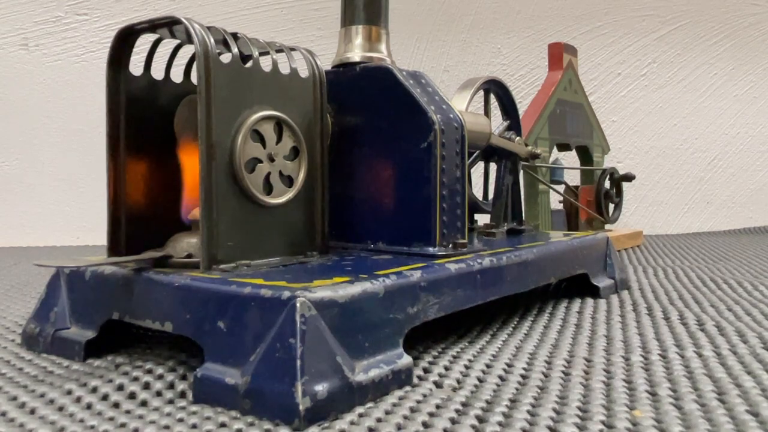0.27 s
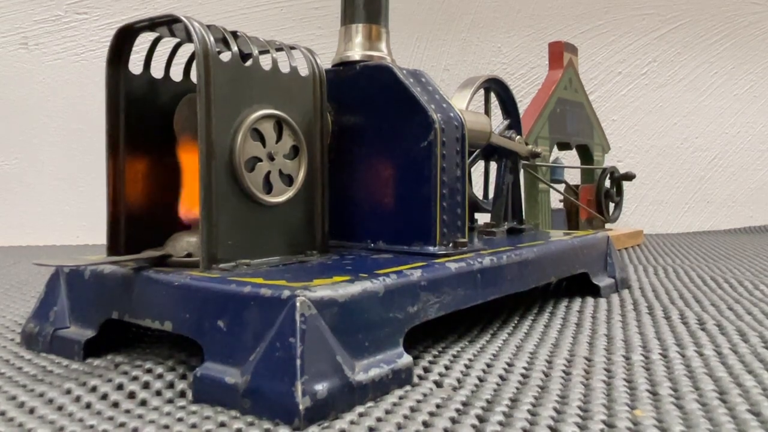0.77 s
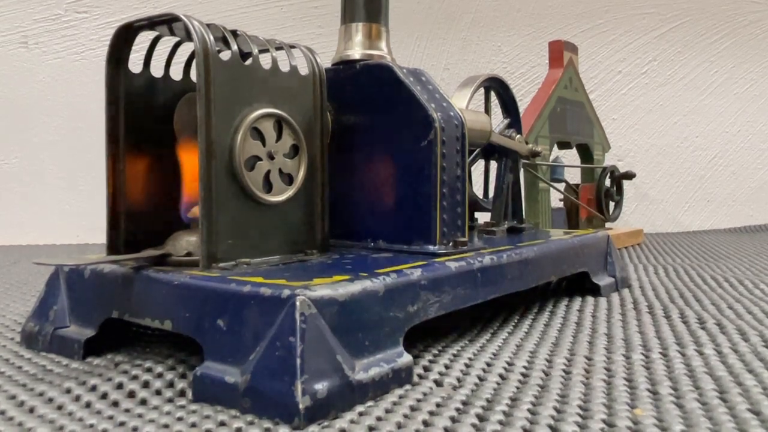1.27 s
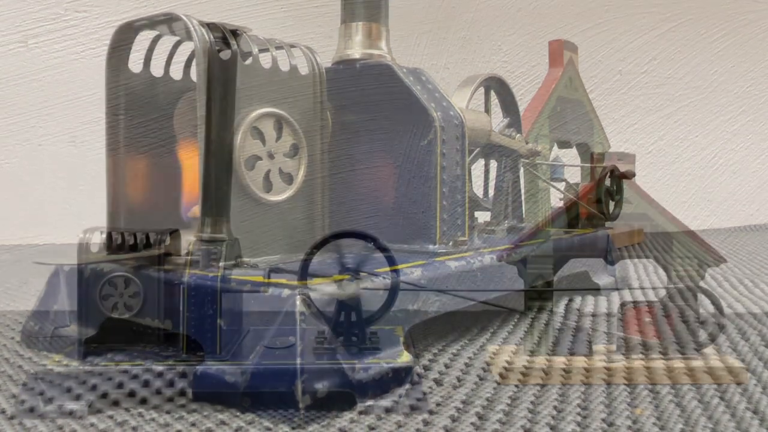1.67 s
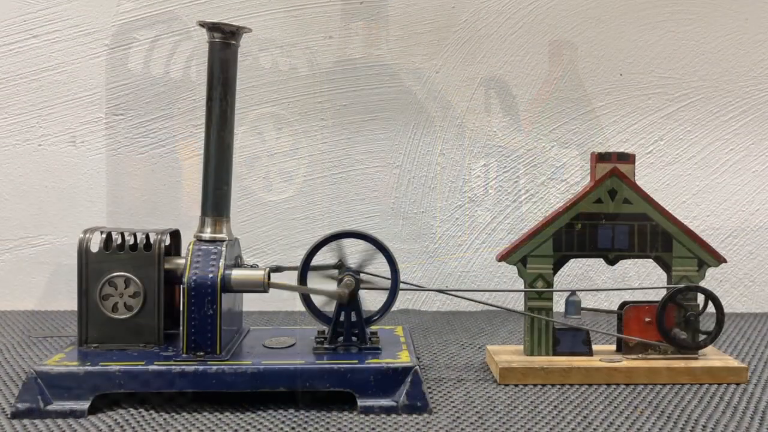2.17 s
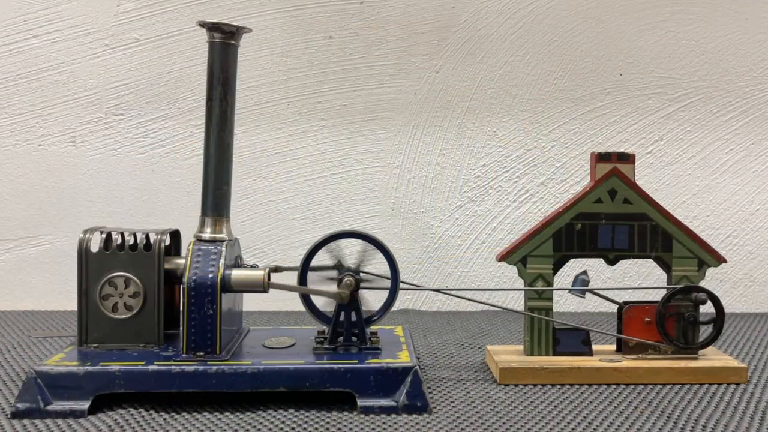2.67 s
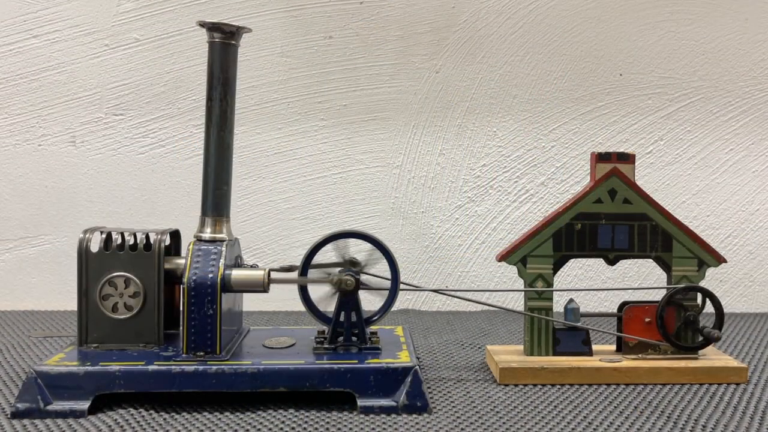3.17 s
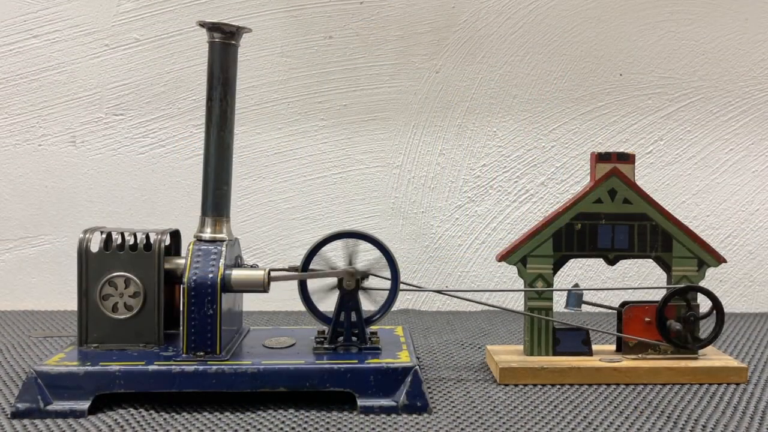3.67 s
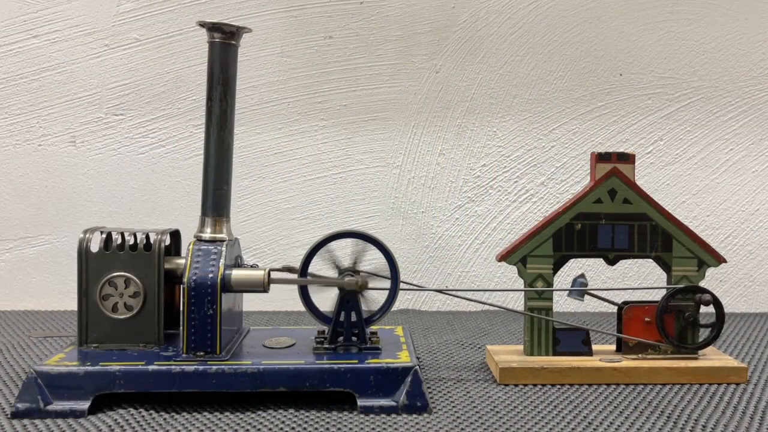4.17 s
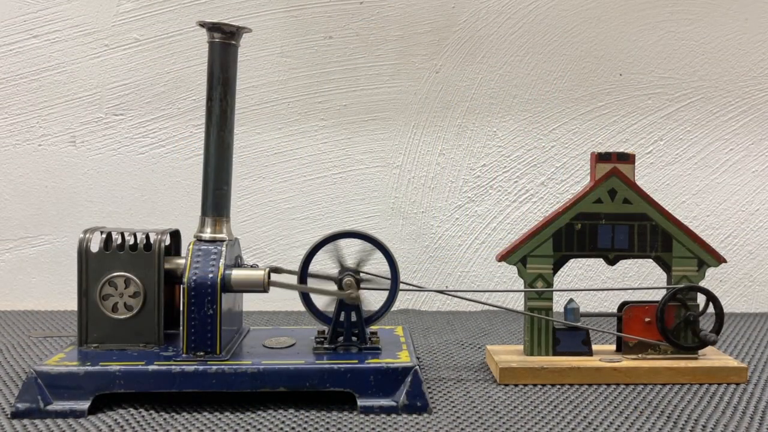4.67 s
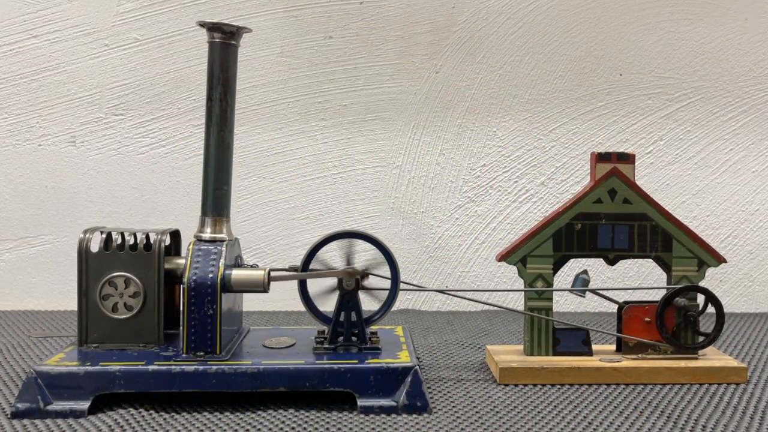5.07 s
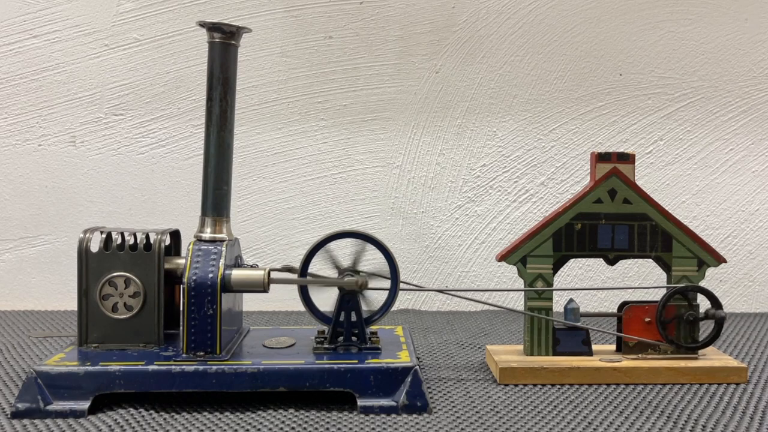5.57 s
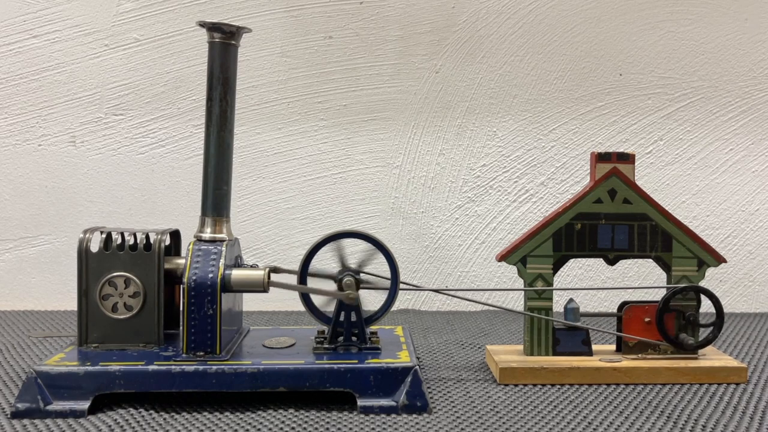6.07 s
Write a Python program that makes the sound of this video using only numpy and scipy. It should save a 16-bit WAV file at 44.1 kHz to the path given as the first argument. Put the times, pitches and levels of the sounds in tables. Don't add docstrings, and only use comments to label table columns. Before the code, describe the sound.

A faint thin metallic rattle gives way to a small tin engine's fast even clatter, with a toy mill's hammers tapping over a low table hum.

```python
import sys
import numpy as np
from scipy import signal
from scipy.fft import rfft, irfft, next_fast_len
from scipy.io import wavfile

SR = 44100
rng = np.random.default_rng(int(sys.argv[2]) if len(sys.argv) > 2 else 0)


def linear_from_db(decibels):
    return 10 ** (np.asarray(decibels, float) / 20)


def digitize_waveform(pressure):
    field = np.atleast_2d(pressure).T
    bounded = np.clip(field, -1, 1)
    quanta = np.round(bounded * 32767).astype(np.int16)
    wavfile.write(sys.argv[1], SR, quanta)


N = 279594
TIME_S = np.arange(N) / SR
THUD_HZ = 109.7


def in_time(rows):
    s, *columns = np.transpose(rows)
    return [np.interp(TIME_S, s, c) for c in columns]


def at_hz(points, hz):
    f, v = np.transpose(points)
    return np.interp(np.log(hz + 1), np.log(f + 1), v)


def rms_one(x):
    return x / np.sqrt(np.mean(x ** 2) + 1e-30)


def clicks(s, db):
    out = np.full(N, 1e-18)
    index = np.clip((np.asarray(s) * SR).astype(int), 0, N - 1)
    np.add.at(out, index, linear_from_db(np.asarray(db)))
    return out


def resonate(x, hz, width_hz):
    r, w = np.exp(-np.pi * width_hz / SR), 2 * np.pi * hz / SR
    return signal.lfilter([0, np.sin(w)], [1, -2 * r * np.cos(w), r * r], x)


def soft_ring(x, hz, width_hz):
    twice = resonate(resonate(x, hz, width_hz), hz, width_hz)
    return twice * 2 * np.e * np.pi * width_hz / SR


def struck(s, db, modes):
    luck_db = 1.2 * rng.standard_normal((len(s), len(modes)))
    return sum(soft_ring(clicks(s, db + mode_db + luck_db[:, k]), hz, width)
               for k, (hz, width, mode_db) in enumerate(modes))


def grains(per_s, spread_db):
    sizes = linear_from_db(spread_db * np.minimum(rng.exponential(1, N), 4)) * rng.choice([-1, 1], N)
    return rms_one(sizes * (rng.random(N) < per_s / SR))


def coloured(x, spectrum):
    gain = linear_from_db(at_hz(spectrum, np.fft.rfftfreq(N, 1 / SR)))
    return irfft(rfft(x) * rms_one(gain), N)


def dying(s, db, t60):
    return signal.lfilter([1], [1, -linear_from_db(-60 / (t60 * SR))], clicks(s, db))


def room(x):
    t60_s, wall_cut_hz = 0.24, 5000
    size = next_fast_len(N + SR)
    w = 2 * np.pi * np.fft.rfftfreq(size)
    lags = (rng.uniform(.004, .03, (2, 8, 1)) * SR).astype(int)
    t60 = t60_s / (1 + (w * SR / (2 * np.pi * wall_cut_hz)) ** 2)
    loop = linear_from_db(-60 * lags / SR / t60) * np.exp(-1j * w * lags)
    signs = (-1) ** np.arange(8)[:, None]
    echoes = np.sum(signs * loop / (1 - loop), axis=1)
    return irfft(rfft(x, size) * echoes, size)[:, :N]


# [f/Hz, phase/rad]
PORT_LEAD = [(100, 0), (780, .6), (1810, .1), (3270, 1.0), (4000, .4), (6100, .4), (6800, 0), (7500, 1.1),
             (8800, -.2), (9800, -2.8), (10900, -3.5)]


def ports(x, lean, lead):
    hz = np.fft.rfftfreq(N, 1 / SR)
    half = linear_from_db(at_hz(lean, hz) / 2) * np.exp(.5j * lead * at_hz(PORT_LEAD, hz))
    return irfft(rfft(x) * np.array([half, 1 / half]), N)


# [t/s, sliding noise level/dB, table hum level/dB]
RUNNING = [(1.2, -100, -110), (1.5, -70.5, -94), (1.75, -58.5, -82), (2.0, -55, -66), (2.25, -54, -64),
           (3.5, -54, -61.5), (4.8, -53.5, -62.5), (6.34, -54.5, -61.5)]
# [f/Hz, level/dB per Hz]
RUN_COLOUR = [(32, -35), (55, -14), (283, -17), (523, -15.5), (628, -40), (788, -5), (883, -13),
              (1130, -11), (1460, -1), (1960, -11.5), (2150, -11), (4250, -14.5), (4760, -16.5),
              (9210, -17), (12700, -16), (16500, -105), (22000, -120)]
# [f/Hz, left-right likeness/1]
LIKENESS = [(60, 0.19), (170, 0.7), (500, 0.68), (1460, 0.073), (4220, 0.13), (12200, 0.13)]
# [f/Hz, left minus right level/dB]
SIDE_LEAN = [(200, 0), (350, 0), (640, 2.5), (1150, 3), (2080, 2), (3750, 4), (6760, 3), (10000, 0)]


def running():
    hum_hz, rumble_hz, rumble_db = 46, 141, -11
    noise_db, hum_db = in_time(RUNNING)
    mid, side = rng.standard_normal((2, N))
    left_right = np.array([[1], [-1]])
    hz = np.fft.rfftfreq(N, 1 / SR)
    alike = np.clip(at_hz(LIKENESS, hz), -1, 1)
    pair = np.sqrt(1 + alike) * rfft(mid) + np.sqrt(1 - alike) * rfft(side) * left_right
    gain_db = at_hz(RUN_COLOUR, hz) + at_hz(SIDE_LEAN, hz) / 2 * left_right
    noise = rms_one(irfft(pair * linear_from_db(gain_db), N))

    wobble = 0.088 * rms_one(resonate(resonate(side, hum_hz, 7.9), hum_hz, 13.0))
    hum = np.sqrt(2) * np.sin(2 * np.pi * hum_hz * TIME_S) + wobble
    hum += linear_from_db(-9.5) * rms_one(soft_ring(mid, THUD_HZ, 35))
    lumps = rms_one(signal.lfilter([1], [1, -2 * .9985, .9985 ** 2], side))
    hum += linear_from_db(rumble_db + 4.7 * lumps) * rms_one(soft_ring(mid[::-1], rumble_hz, 207))
    return linear_from_db(noise_db) * noise + linear_from_db(hum_db) * hum


# [t/s, peak level/dB]
TICKS = [(0.0527, -53), (0.076, -52), (0.1036, -51), (0.1423, -49), (0.164, -48), (0.1825, -48),
         (0.2461, -46), (0.3366, -44), (0.3551, -49), (0.3795, -55), (0.395, -44), (0.4414, -58),
         (0.5412, -59), (0.5527, -48), (0.658, -43), (0.7524, -41), (0.8126, -45), (0.829, -49),
         (0.849, -42), (0.9193, -68), (1.1458, -60), (1.1812, -49), (1.242, -54), (1.3364, -51),
         (1.3653, -51), (1.405, -47), (1.4333, -52), (1.4865, -42)]


def linkage_ticks():
    gap_s, loose_db, spread_db = 0.013, -59.5, 6.5
    luck = rng.standard_normal((120, 2))
    s = np.cumsum(gap_s * np.exp(.3 * luck[:, 0]))
    db = loose_db + spread_db * np.minimum(luck[:, 1], 1)
    clear_s, clear_db = np.transpose(TICKS)
    keep = s < 1.5
    return np.r_[clear_s + .0015, s[keep]], np.r_[clear_db - 6.0, db[keep]]


# [t/s, peak level/dB]
BUMPS = [
    (0.244, -58),
    (0.75, -50.5),
    (0.882, -55),
    (0.993, -57.5),
    (1.287, -63),
]
# [t/s, level/dB]
CLOSE_UP = [(0.0, -75), (0.02, -74), (0.31, -75), (0.354, -73.5), (1.214, -75.5), (1.244, -70.5),
            (1.296, -75), (1.45, -75)]
# [f/Hz, level/dB per Hz]
CLOSE_COLOUR = [(50, 1.5), (200, -6.5), (1000, -8.5), (1300, -13), (1900, -4), (2800, -10), (3550, -22.5),
                (4550, -15.5), (6900, -27), (7800, -16.5), (8650, 1.5), (10200, -24), (10900, -8.5),
                (12700, -24.5)]
# [f/Hz, left minus right level/dB]
CLOSE_LEAN = [(60, -3), (170, 0), (500, 3.0), (1460, 4.5), (4220, 8.5), (12200, -2.5)]


def close_up():
    level, = linear_from_db(in_time(CLOSE_UP))
    level *= np.clip((2.05 - TIME_S) / .5, 0, 1) ** 2
    s, db = linkage_ticks()
    envelope = level * linear_from_db(8.0) + dying(s - .001, db - 4.0, 0.0076)
    rattle = envelope * (0.74 * grains(14000, spread_db=5.5) + rng.standard_normal((2, N)))
    shared, own = rng.standard_normal(N), rng.standard_normal((2, N))
    flame = level * linear_from_db(8.0) * (0.74 * shared + 0.57 * own)
    above = signal.butter(2, 900, "high", fs=SR, output="sos")
    below = signal.butter(2, 900, "low", fs=SR, output="sos")
    pair = signal.sosfilt(above, rattle) + signal.sosfilt(below, flame)
    s, db = np.transpose(BUMPS)
    bumps = sum(soft_ring(clicks(s, db - 12), hz, 100) for hz in (380, 560, 900))
    return ports(np.array([coloured(ear, CLOSE_COLOUR) for ear in pair]) + bumps, CLOSE_LEAN, lead=0)


def thumps(rows):
    s, knock_db = np.transpose(rows)[:2]
    return struck(s - .01, knock_db - 35, [(THUD_HZ, 45, 0), (165, 60, -3)])


# [t/s, peak level/dB, f/Hz]
FLICKERS = [(1.848, -66, 10700), (2.1519, -65, 11100), (2.329, -59, 10300), (2.4208, -60, 10600),
            (2.629, -55, 11300), (2.9656, -67, 10700), (3.2858, -65, 10200), (3.431, -68, 10400),
            (3.7353, -65, 11200), (4.0735, -60, 10700), (4.1394, -56, 11700), (4.448, -65, 11200),
            (4.9142, -50, 11240), (5.2264, -63, 10640), (5.4, -59, 10700), (5.6754, -54, 10900),
            (6.0136, -58, 10600), (6.325, -54, 10600)]


def flickers(rows):
    end_db, spread_db, end_hz = (-33, -25.5), 3.5, 10600
    flashes = []
    for k, ((s, _, chatter_db, _), (a, b)) in enumerate(zip(rows, rng.standard_normal((70, 2)))):
        flashes.append((s + 0.0012, chatter_db + end_db[k % 2] + spread_db * a, end_hz + 300 * b))
    out = np.zeros(N)
    for bursts, span in ((FLICKERS, 1500), (flashes, 600)):
        for (s, db, hz), hiss in zip(bursts, rng.standard_normal((70, span))):
            i = int((s - .008) * SR)
            band = rms_one(soft_ring(soft_ring(hiss, hz, 1150), hz, 1150))
            burst = linear_from_db(db - 5.0) * np.hanning(span) * band
            out[i:i + span] += burst[:N - i]
    return out


# [middle t/s, length/s, scrape level/dB, squeak level/dB]
LIFTS = [
    (1.94, 0.16, -60, -67),
    (2.711, 0.28, -59, -59),
    (3.453, 0.35, -57.5, -91),
    (4.21, 0.2, -58, -77),
    (5.008, 0.24, -58.5, -62),
    (5.754, 0.29, -59, -62),
]


def squeak():
    squeak_hz = 11300
    swell = sum(linear_from_db(db) * np.exp(-((TIME_S - s + 0.067) / 0.029) ** 2) for s, _, _, db in LIFTS)
    slips = grains(3700, spread_db=6.0)
    return swell * rms_one(soft_ring(soft_ring(slips, squeak_hz, 1000), squeak_hz, 1000))


# [t/s, peak level/dB, rebound delay/s, rebound level/dB, rebound f/Hz]
HAMMER = [(1.4826, -55, .0104, -55, 3230), (1.749, -39, .0055, -52, 3170), (2.257, -33.5, .0075, -26, 3230),
          (2.5222, -30.5, .0035, -33.5, 3400), (3.0202, -31.5, .0085, -36, 3170),
          (3.2837, -33.5, .0065, -41, 2450), (3.7789, -30, .0069, -29, 3400),
          (4.0452, -32.5, .0044, -30.5, 3150), (4.552, -31, .0027, -34, 2520),
          (4.8148, -38, .0057, -32, 3230), (5.3146, -32, .0074, -33.5, 3340),
          (5.5766, -33, .0029, -31, 2480), (6.0742, -34, .0108, -33.5, 3400),
          (6.3292, -39, .0077, -31.5, 3130)]
# [t/s, peak level/dB]
TRIPS = [
    (2.1541, -32.5),
    (2.9158, -28),
    (3.6671, -36.5),
    (4.446, -31),
    (5.2104, -39),
    (5.9682, -39.5),
]
# [t/s, peak level/dB]
LONE_TAPS = [(1.8146, -45), (1.9155, -46), (1.9609, -42), (2.581, -42), (2.5901, -34.5), (2.741, -41),
             (2.7496, -44), (3.4834, -50), (3.506, -37), (4.1174, -32.5), (4.1835, -47), (4.202, -40),
             (4.246, -42), (4.8813, -36.5), (5.6459, -34.5)]
# [delay/s, relative level/dB]
RATTLE_TOUCHES = [
    (.0025, -12),
    (.0048, -19),
    (0.0107, -11.5),
    (0.016, -15.5),
]


def mill_taps():
    trip_hz, lone_hz, stamp_hz = 3170, 2460, (2520, 2590)
    settle_s, settle_db, settle_hz = 0.0056, -20.5, 2280
    end_s = N / SR
    taps = [(s, db, trip_hz) for s, db in TRIPS] + [(s, db, lone_hz) for s, db in LONE_TAPS]
    for k, (s, db, after, rebound_db, hz) in enumerate(HAMMER):
        taps.append((s, db, stamp_hz[k % 2]))
        taps.append((s + after, rebound_db, hz))
        taps.append((min(s + after + settle_s, end_s), rebound_db + settle_db, settle_hz))
        for lag, lag_db in RATTLE_TOUCHES:
            taps.append((min(s + lag, end_s), db + lag_db, rng.uniform(1540, 3240)))
    return taps


def mill():
    out, taps = np.zeros(N), mill_taps()
    for s, db, hz in taps:
        i = int((s - .0007) * SR)
        tap = soft_ring(clicks([0], [db])[:600], hz, 620)[:N - i]
        out[i:i + len(tap)] += tap

    s, db, _ = np.transpose(taps)
    rattle = dying(s, db - 24.5, 0.024) * grains(2500, spread_db=4.0)
    rattle_modes = [(2300, -6), (2680, 0), (3080, 2), (3380, 1.0)]   # Hz, dB
    out += sum(linear_from_db(db) * soft_ring(rattle, hz, 434) for hz, db in rattle_modes)

    lift = sum(linear_from_db(db) * np.exp(-((TIME_S - s) / (length / 2)) ** 4) for s, length, db, _ in LIFTS)
    slips = grains(260, spread_db=4.0)
    stem_modes = [(2230, -15.5), (2400, -6.5), (2660, 2)]   # Hz, dB
    stem = sum(linear_from_db(db) * rms_one(resonate(slips, hz, 83)) for hz, db in stem_modes)
    return out + lift * (rms_one(soft_ring(slips, 2450, 390)) + stem)


# [t/s, angle/turns]
CRANK = [(1.492, 0), (1.9652, 3), (2.2801, 5), (2.7503, 8), (3.0633, 10), (3.3728, 12), (3.842, 15),
         (4.3103, 18), (4.623, 20), (4.9354, 22), (5.4027, 25), (5.8689, 28), (6.024, 29), (6.332, 31)]
# [t/s, level/dB]
FADE_IN = [(1.49, -20), (1.65, -12.5), (1.8, -5), (1.96, -3.5), (2.12, 0), (6.34, 1)]
# [crank knock level/dB, pin chatter level/dB, base plate level/dB]
STROKE_DB = [
    (-27.5, -38.5, -40),
    (-30.5, -37, -46),
]
# [knock, chatter, plate growth/dB per s]
GROWTH_DB_PER_S = [
    (.1, -0.019, 0.19),
    (.45, -0.26, 0.53),
]
# [knock, chatter, plate level/dB]
UNEVEN_DB = [
    (.5, 1.2, .6),
    (.6, .8, 1.6),
]
# [t/s, knock level/dB]
CUSHIONED = [(2.28, -1.5), (2.751, -3.5), (2.907, -1), (3.373, -1), (3.529, -4.5), (3.686, -1.5),
             (4.154, -3), (4.623, -2), (4.701, -2.5), (5.403, -2), (5.869, -4.5), (6.178, -3.5)]


def strokes():
    plate_share = 0.13
    crank_s, turns = np.transpose(CRANK)
    s = np.interp(np.arange(0, turns[-1] + .5, .5), turns, crank_s)
    side = np.arange(len(s)) % 2
    db = np.array(STROKE_DB)[side] + np.array(GROWTH_DB_PER_S)[side] * (s[:, None] - 4)
    db += np.array(UNEVEN_DB)[side] * rng.standard_normal((len(s), 3))
    db += np.interp(s, *np.transpose(FADE_IN))[:, None]
    for at, sag_db in CUSHIONED:
        db[np.argmin(abs(s - at))] += [sag_db, 0, -plate_share * sag_db]
    return np.column_stack([s, db])


# [lead t/s, knock level/dB, chatter level/dB, plate level/dB, deep plate level/dB, chatter t60/s]
INWARD = [
    (-.021, -55, -22.5, -23, -19, 0.053),
    (-.015, -21, -8.5, -7.5, -24, 0.019),
    (-.0085, -17.5, -1.5, -15, -5.5, 0.017),
    (-.0027, -2, -7, 0, -9, 0.039),
    (.012, -35, -18.5, -26, -12.5, 0.042),
    (.026, -25.5, -31, -15, -18, 0.048),
]
OUTWARD = [
    (-.029, -12, -13, -4.5, -5, 0.046),
    (-.022, -23, -36, -47, -0.5, 0.012),
    (-.006, -33, -5.5, 4, -0.5, 0.02),
    (-.0027, -1.5, -0.5, 2, -19, 0.021),
    (.002, -13, -13, -15, -4, 0.072),
    (.014, -20.5, -20.5, -8, -21, 0.092),
]
# [f/Hz, width/Hz, level/dB]
TIN = [(2220, 113, -5), (2755, 490, 3), (3088, 127, -1.5), (3386, 215, 0.5), (3948, 74, -7),
       (4213, 106, -4), (4475, 68, -6), (4900, 590, 2.5), (6045, 125, -1), (6024, 210, -2),
       (7500, 95, -9.5), (7620, 630, -52), (9510, 830, 1.5)]
# [f/Hz, width/Hz, level/dB]
PLATE = [(901, 144, 1), (1032.5, 35.4, -12), (1005, 21, -20), (801, 94, -13.5)]
# [f/Hz, width/Hz, level/dB]
DEEP_PLATE = [(663.5, 101, -4), (430, 87, -11)]
# [f/Hz, width/Hz, level/dB]
KNOCK = [(1415, 390, 0), (1525, 390, -1)]
# [f/Hz, level/dB per Hz]
CHATTER_COLOUR = [(1060, -52), (1800, 9), (2600, -25), (4280, -7), (4830, -2.5), (6020, 0.5), (9360, 4.5),
                  (11200, 28.5), (12700, -51), (16500, -93), (22000, -120)]


def engine(rows):
    knock, low, spray, crack = np.zeros((4, N))
    for start, contacts in enumerate((INWARD, OUTWARD)):
        s, knock_db, chatter_db, plate_db = np.transpose(rows[start::2])
        plate, deep = [], []
        for lead, k_db, c_db, p_db, deep_db, t60 in contacts:
            slack = rng.standard_normal((len(s), 3)) * (k_db < -8)
            at = s + lead + .0005 * slack[:, 0]
            knock += clicks(at, knock_db + k_db + 1.23 * slack[:, 1])
            plate += zip(at, plate_db + p_db - 3.0)
            deep += zip(at, knock_db + deep_db - 14.5)
            spray += dying(at, chatter_db + c_db + 1.56 * slack[:, 2], t60)
            crack += clicks(at, chatter_db + c_db + 16)
        low += struck(*np.transpose(plate), PLATE)
        low += struck(*np.transpose(deep), DEEP_PLATE)

    chatter = spray * grains(14000, spread_db=2.0)
    casing = sum(linear_from_db(db) * resonate(chatter, hz, max(width, 40)) * (-1) ** k
                 for k, (hz, width, db) in enumerate(TIN))
    low += sum(linear_from_db(db - 28.5) * resonate(chatter, hz, width) for hz, width, db in PLATE + DEEP_PLATE)

    oily = soft_ring(knock, 1465, 430)
    blow = linear_from_db(-28) * oily + linear_from_db(-31) * chatter
    bearing = sum(linear_from_db(db - 6.5) * soft_ring(blow, hz, width) for hz, width, db in KNOCK)
    bearing += linear_from_db(-7.5) * soft_ring(knock, 2620, 980)
    pins = linear_from_db(10.5) * coloured(chatter + crack, CHATTER_COLOUR)
    return bearing + low + pins + linear_from_db(-23.5) * casing


def scene():
    mill_pan_db, room_db, body_cut_hz, top_hz = -2.5, -20.5, 498, 9800
    small = signal.butter(3, body_cut_hz, "high", fs=SR, output="sos")
    rows = strokes()
    motor, stamps = signal.sosfilt(small, [engine(rows), mill()])
    panned = linear_from_db(mill_pan_db / 2 * np.array([[1], [-1]])) * stamps
    toys = motor + panned + linear_from_db(room_db) * room(motor + stamps)
    heard = ports(toys, SIDE_LEAN, lead=1) + running() + thumps(rows)
    steep = signal.ellip(7, .5, 50, top_hz, fs=SR, output="sos")
    heard = signal.sosfilt(steep, heard)
    bright = ports(squeak() + flickers(rows), SIDE_LEAN, lead=.15)
    return heard + bright + close_up()


def band_limit(x):
    return signal.sosfilt(signal.butter(12, 12810, fs=SR, output="sos"), x)


def record(dry):
    subsonic = signal.butter(2, 32.2, "high", fs=SR, output="sos")
    mix = signal.sosfilt(subsonic, dry)
    return band_limit(mix)


dry = scene()
out = record(dry)
digitize_waveform(out)
```